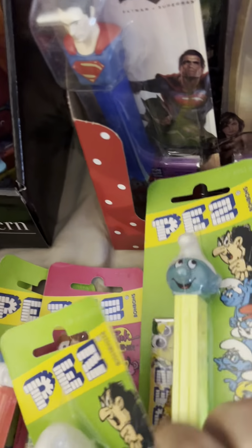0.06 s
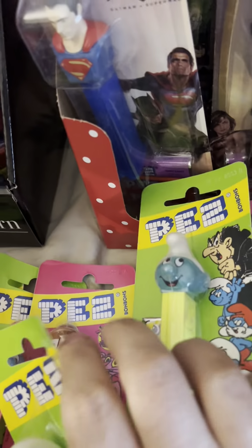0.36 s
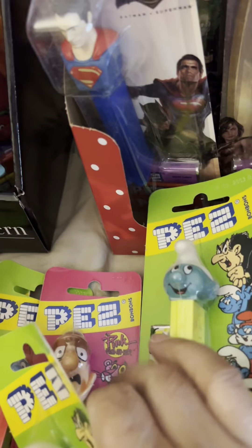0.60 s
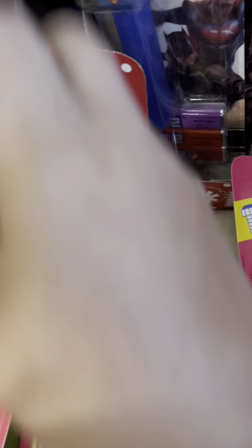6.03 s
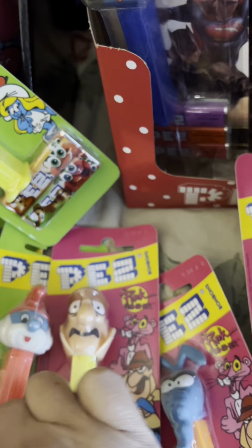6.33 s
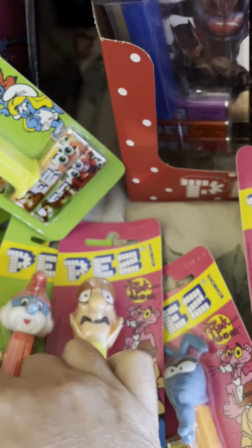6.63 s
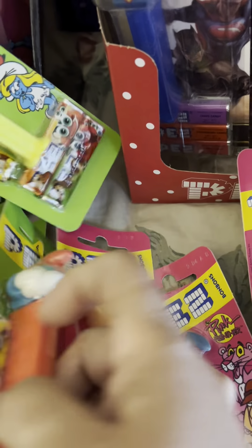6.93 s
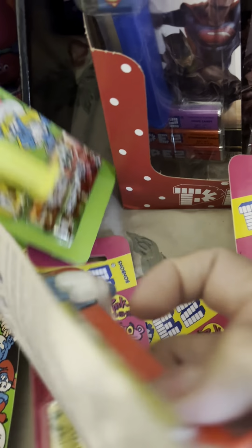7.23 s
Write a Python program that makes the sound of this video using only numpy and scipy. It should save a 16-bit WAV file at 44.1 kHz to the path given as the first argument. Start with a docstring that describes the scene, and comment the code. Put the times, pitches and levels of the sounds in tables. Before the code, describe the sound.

Close handling of plastic and cardboard toy packs, sliding and crinkling against each other with snaps and light bumps.

```python
"""Shuffling toys in blister packs

Carded toys in plastic blisters are shuffled by hand, close by, in a quiet small room. Sliding friction
of card on plastic makes a hiss and a rasp; the thin blisters buckle with ticks and snaps. Impacts
between the packs excite the damped modes of the card, and handling the pile gives an occasional low
boom. Once, a card edge judders across a blister in stick-slip motion."""
import sys
import numpy as np
from scipy import signal
from scipy.fft import rfft, irfft, next_fast_len
from scipy.io import wavfile
from scipy.ndimage import uniform_filter1d, map_coordinates

SR = 44100
rng = np.random.default_rng(int(sys.argv[2]) if len(sys.argv) > 2 else 0)


def store_wav(level_fs):
    """Save 16-bit WAV to argv[1]."""
    pcm = np.round(np.clip(np.atleast_2d(level_fs), -1, 1) * 32767)
    wavfile.write(sys.argv[1], SR, pcm.T.astype(np.int16))


N = 321467

# impacts between packs: (time [s], relative level [dB], centre frequency [Hz])
IMPACTS = [(0.103, -30, 576), (0.118, -38, 170), (0.837, -37, 210), (0.872, -44.5, 116),
           (2.415, -39.5, 113), (3.029, -27, 265), (3.056, -22, 253), (3.144, -21, 364), (3.164, -29, 170),
           (3.2516, -18.5, 468), (3.254, -11, 169), (3.473, -30, 207), (3.91, -23.5, 363),
           (4.032, -34, 273), (5.364, -42, 285), (5.545, -30, 442), (5.602, -29, 387), (5.778, -28.5, 237),
           (5.966, -43.5, 173), (6.1, -21, 170), (6.26, -36, 312), (6.693, -30, 395), (6.741, -31.5, 124),
           (6.777, -27, 292), (6.941, -23, 317), (7.253, -23, 226)]
# spectrum of buckling plastic: (frequency [Hz], level [dB])
BUCKLING_SPECTRUM = [(300, -20), (900, 8.5), (2100, 1.5), (3000, -3), (4000, 1), (7500, -1), (11000, -6),
                     (15800, -16)]


def sliding():
    """Sliding friction: plastic hisses and card rasps, both catching unevenly, while the packs flex."""
    # spectra of the plastic, the card and the bending packs: (frequency [Hz], level [dB])
    hiss_spectrum = [(2300, -8.5), (3000, -3), (3900, -1.5), (4700, -4), (6200, -1), (8200, -2),
                     (11000, -10), (15800, -15.5)]
    rasp_spectrum = [(550, -17.5), (700, -8), (900, 2.5), (1250, 0), (1650, 4.5), (2150, 2.5), (2550, 0),
                     (3200, -17)]
    flex_spectrum = [(45, -5.5), (75, 4), (120, 1), (190, -1), (290, -0.5), (360, -1.5), (450, -5.5),
                     (600, -7), (780, -13)]
    hiss_gain, rasp_gain, flex_gain = slide_gains()
    catching = amp(1.6 * wobble(60) + wobble(250))
    hiss = catching * friction(N, rough_db=1.0, grain_hz=1573, patchy_db=3.0)
    hiss = unit(filtered(hiss, lambda hz: shape(hiss_spectrum, hz)))
    rasp = catching * friction(N, rough_db=2.0, grain_hz=580, patchy_db=5.0)
    rasp = unit(filtered(rasp, lambda hz: shape(rasp_spectrum, hz)))
    flex = friction(N, rough_db=4.0, grain_hz=61.8, patchy_db=2.5)
    flex = unit(filtered(flex, lambda hz: shape(flex_spectrum, hz)))
    return hiss_gain * hiss + rasp_gain * rasp + np.hypot(flex_gain, settling()) * flex


def slide_gains():
    """Friction noise grows with speed, and pressure adds rasp and bending: gains of hiss, rasp, flex."""
    # one pack pushed across the others: (time [s], rise [s], hold [s], level [dB], pressure [dB])
    slides = [(0.0, 0.0019, 0.0062, -43, 9), (0.026, 0.034, 0.049, -49, 6.5), (0.107, .03, 0.094, -58, 5.5),
              (0.226, 0.066, 0.049, -55.5, 0.5), (0.378, 0.08, 0.1, -52, -0.5),
              (0.596, 0.04, 0.021, -51, -6.5), (0.649, .03, .12, -59.5, 2), (0.8, 0.04, 0.021, -51.5, -1.5),
              (0.924, 0.058, 0.056, -53.5, -7.5), (1.08, 0.19, 0.11, -55.5, -6.5),
              (1.355, 0.081, 0.088, -61.5, -11), (1.966, 0.11, 0.044, -67, 0.5),
              (2.127, 0.013, 0.11, -48.5, -6.5), (2.336, 0.086, 0.084, -46.5, -2.5),
              (2.532, 0.061, 0.099, -48.5, -5), (2.836, 0.12, 0.015, -64, 5.5),
              (3.007, 0.031, 0.035, -53, 14), (3.147, .005, 0.021, -50, -2),
              (3.199, 0.042, 0.033, -52, 8.5), (3.514, .06, 0.03, -49.5, 4.5),
              (3.605, 0.02, 0.051, -55.5, 3), (3.68, 0.052, 0.089, -58, 3), (3.841, 0.047, 0.026, -51.5, 4),
              (4.021, 0.0078, 0.045, -52.5, -2), (4.1, 0.048, 0.16, -67.5, 4),
              (4.887, 0.072, .003, -57.5, -10.5), (5.241, 0.039, .02, -67.5, 1.5),
              (5.358, .01, .07, -62, 11), (5.429, .04, .025, -55, 4.5), (5.526, 0.038, 0.083, -58.5, 15.5),
              (5.661, 0.13, 0.046, -56.5, 10), (6.027, 0.076, 0.0082, -53, 6.5),
              (6.251, 0.014, 0.062, -59, 6), (6.35, 0.036, 0.092, -62, 4.5),
              (6.474, 0.053, 0.023, -50.5, 1), (6.572, 0.049, 0.12, -53.5, 0), (6.721, 0.069, .12, -51, 7),
              (6.907, 0.041, 0.073, -46, 6.5), (7.029, 0.044, 0.13, -49, 5.5), (7.218, 0.064, .02, -39, 5)]
    swell_db, stop_t60 = 18, 0.11  # the hand gathers speed, then stops
    creep_db, creep_t60 = -7.5, 0.54  # the packs creep on a little
    power, t = np.zeros((3, N)), np.arange(SR) / SR
    for start, rise, hold, db, pressure_db in slides:
        to_go = np.maximum(1 - t / rise, 0)
        swell = amp(-swell_db * to_go ** 2) * (1 - to_go ** 10)
        after = np.maximum(t - rise - hold, 0)
        speed = swell * np.maximum(fade(after, stop_t60), amp(creep_db) * fade(after, creep_t60))
        rasp_db = -1.5 + 0.22 * pressure_db
        layers = amp([[0], [rasp_db], [pressure_db]])
        add(power, start, (amp(db) * layers * speed) ** 2)
    return np.sqrt(power)


def friction(size, rough_db, grain_hz, patchy_db):
    """Dense micro-slips excite resonances whose narrow peaks and broad colour shift with the contact."""
    def patches(bins, frames):
        across_frequency = uniform_filter1d(rng.standard_normal(spectra.shape[1:]), bins, axis=0)
        return unit(uniform_filter1d(across_frequency, frames, axis=1))

    spectra = signal.stft(rng.standard_normal((2, size + 4096)), nperseg=1024)[2]
    colour_db = patchy_db * (patches(bins=4, frames=7) + .7 * patches(bins=28, frames=10))
    noise = signal.istft(spectra * amp(colour_db), nperseg=1024)[1][:, :size]
    return stereo(noise * amp(rough_db * wobble(grain_hz, size)))


def scrapes(rise_s, release_t60):
    """Transient friction: short scrapes, and one longer, dark rasp of card during a slide."""
    # bursts of friction: (time [s], duration [s], level [dB], tilt above 800 Hz [dB/octave])
    bursts = [(0.043, 0.033, -43.5, 6), (0.436, 0.044, -48, -5.5), (0.857, 0.0196, -42.5, -5.5),
              (0.935, 0.012, -42.5, 2.5), (2.136, 0.024, -49.5, -2.5), (2.394, .035, -51, -5.5),
              (2.571, 0.123, -47, -18), (3.469, 0.026, -45, -5.5), (3.537, 0.012, -46.5, -1),
              (3.57, 0.027, -43, -2.5), (3.672, 0.012, -44, 9), (3.898, 0.063, -34, -1.5),
              (5.359, 0.0083, -47.5, -8.5), (5.599, 0.025, -44, -1.5), (6.259, 0.02, -45, -2),
              (6.687, 0.016, -41.5, -3), (6.9305, .011, -31.5, -2.5), (7.234, 0.012, -41.5, -7)]
    # spectrum of a scrape: (frequency [Hz], level [dB])
    spectrum = [(120, -35.5), (300, 5), (900, -3.5), (1800, 5), (2800, -0.5), (4000, -5), (7000, -3.5),
                (11000, -10), (15800, -20)]
    out, t = np.zeros((2, N)), np.arange(SR // 6) / SR
    for start, duration, db, tilt_db in bursts:
        tilt = lambda hz: amp(tilt_db * np.log2(np.maximum(hz, 800) / 800))
        grit = friction(len(t), rough_db=1.0, grain_hz=696, patchy_db=2.0)
        grit = unit(filtered(grit, lambda hz: shape(spectrum, hz) * tilt(hz)))
        envelope = (1 - np.exp(-t / rise_s)) * fade(np.maximum(t - duration, 0), release_t60)
        add(out, start, amp(db) * grit * envelope)
    return out


def snaps(crack_t60, shell_t60, gain_db):
    """Snap-through buckling: a blister gives a broadband crack, and its thin shell rings briefly."""
    # buckling blisters: (time [s], relative level [dB], shell pitch [Hz], ring re crack [dB])
    buckles = [(0.103, -27, 1460, -3.5), (0.251, -46, 1690, 12), (0.488, -32.5, 7240, -6),
               (0.617, -33.5, 6240, -12), (0.64, -42.5, 1860, 6), (0.703, -32.5, 2530, -9),
               (0.772, -45, 9200, 7), (0.839, -39, 1700, 1), (0.871, -33.5, 1390, -9.5),
               (1.7393, -52, 7230, -6), (3.029, -28.5, 2080, -8), (3.058, -21, 4200, -13),
               (3.1447, -15, 1728, -12.5), (3.474, -43, 2300, 9), (3.684, -36, 7500, -2),
               (4.03, -20, 5130, -35), (5.3615, -40.5, 1370, -14), (5.3913, -42, 2100, -3),
               (5.411, -39.5, 1800, -5.5), (5.5468, -24, 1443, -33), (5.6027, -26, 6800, -10),
               (5.774, -32.5, 1560, -37), (6.261, -31.5, 2515, 3), (6.3159, -44, 2600, 8),
               (6.378, -40, 2354, -10), (6.4481, -32, 6970, -17), (6.501, -27.5, 1693, -13),
               (6.544, -34, 1540, -9), (6.58, -32, 4700, -7), (6.6905, -35, 2220, 11),
               (6.7794, -19, 1660, -18), (6.939, -14.5, 3020, -5), (6.945, -16, 2057, 1),
               (7.1782, -28.5, 3660, -7), (7.249, -17.5, 1860, -34)]
    out, t = np.zeros((2, N)), np.arange(SR // 8) / SR
    onset = t < crack_t60 / 3
    for start, db, shell_hz, ring_db in buckles:
        broad = lambda hz: shape(BUCKLING_SPECTRUM, hz) * bell(hz, shell_hz, octaves=1.5)
        narrow = lambda hz: shape(BUCKLING_SPECTRUM, hz) * (bell(hz, shell_hz, octaves=.12) + amp(-21))
        noise = stereo(rng.standard_normal((2, len(t))))
        crack = filtered(noise * fade(t, crack_t60), broad)
        ring = filtered(noise * fade(t, shell_t60), narrow)
        snap = crack / crack[:, onset].std() + amp(ring_db) * ring / ring[:, onset].std()
        add(out, start, amp(db + gain_db) * snap)
    return out


def knocks(gain_db, attack_cycles, hold_s, damping_t60, free_db):
    """Modal vibration: impacts ring the card, soft ones its low modes; the hand damps most of the ring."""
    # modes of a carded pack: (frequency [Hz], level [dB], t60 [s])
    pack_modes = [(111, -6, .12), (139, -3, 0.098), (174.6, 1.5, 0.11), (213, -3.5, 0.11), (257, -5, 0.11),
                  (320.5, -2.5, 0.11), (352.7, -2, 0.087), (436, -0.5, 0.074), (516.4, -2, 0.088),
                  (645, 1, 0.045), (772, -4, 0.075)]
    out, t = np.zeros((2, N)), np.arange(SR // 3) / SR
    hz, mode_db, t60 = np.transpose(pack_modes)[:, :, None]
    for start, db, centre_hz in IMPACTS:
        detune, size, phase = rng.standard_normal((3, len(pack_modes), 1))
        contact_s = attack_cycles / centre_hz  # a softer blow stays in contact for longer
        swing = np.sin(2 * np.pi * (hz * (1 + 0.016 * detune) * t + 0.14 * phase))
        modes = amp(mode_db + 2.1 * size) * bell(hz, centre_hz, octaves=0.56) * fade(t, t60) * swing
        attack = 1 - np.exp(-t / contact_s)
        damping = fade(np.maximum(t - hold_s, 0), damping_t60) + amp(free_db)
        add(out, start, unit(modes.sum(0) * attack * damping) * amp(db + gain_db))
    return out


def settling(gain_db=-26.5, t60=0.29):
    """Free decay: the gain of the pile's flexing dies away after each impact."""
    power, t = np.zeros((1, N)), np.arange(SR) / SR
    for start, db, _ in IMPACTS:
        add(power, start, (amp(db + gain_db) * fade(t, t60)) ** 2)
    return np.sqrt(power[0])


def booms(pitch_hz, t60):
    """Damped oscillation: handling the pile now and then gives a short, low boom."""
    # handling booms: (time [s], level [dB])
    onsets = [(0.107, -32.5), (0.979, -40), (2.41, -38), (3.06, -26), (3.255, -39), (5.613, -34),
              (6.1, -38), (6.751, -35)]
    out, t = np.zeros((2, N)), np.arange(SR // 3) / SR
    boom = np.sin(2 * np.pi * pitch_hz * t) * fade(t, t60) * (1 - np.exp(-t / 0.0049))
    for start, db in onsets:
        add(out, start, amp(db) * boom)
    return out


def judder(jitter, grit_share):
    """Stick-slip motion: each slip of a card edge strikes the resonances of a blister."""
    # course of the judder: (time [s], slip rate [Hz], level [dB])
    course = [(3.896, 335, -60.5), (3.904, 397, -27.5), (3.914, 360, -25.5), (3.921, 365, -22),
              (3.932, 370, -31.5), (3.945, 620, -30), (3.959, 640, -32), (3.967, 700, -66)]
    # resonances of the blister: (frequency [Hz], bandwidth [Hz], level [dB])
    resonances = [(353.6, 81, 0.5), (633, 130, -0.5), (1240, 750, -9), (1450, 170, -0.5), (2000, 300, -8),
                  (3470, 840, -18)]

    def shell(hz):
        return sum((-1) ** k * amp(db) * 1j * hz * width / (centre ** 2 - hz ** 2 + 1j * hz * width)
                   for k, (centre, width, db) in enumerate(resonances))

    t = np.arange(N) / SR
    times, rates, levels = np.transpose(course)
    slip_hz = np.interp(t, times, rates) * (1 + jitter * wobble(300))
    slips = np.diff(np.floor(np.cumsum(slip_hz) / SR), prepend=0)
    force = unit(slips) * np.array([[1], [.6]]) + grit_share * rng.standard_normal((2, N))
    envelope = amp(np.interp(t, times, levels)) * (t > times[0]) * (t < times[-1])
    return unit(stereo(filtered(force, shell))) * envelope


def crinkle(per_second, gain_db, scatter_db, t60):
    """Micro-buckling: the plastic ticks at random, as strongly as the packs are being slid."""
    out, t = np.zeros((2, N)), np.arange(SR // 50) / SR
    effort = slide_gains()[0]
    for when, size, pitch in rng.random((int(per_second * N / SR), 3)):
        centre_hz = 1800 * 5 ** pitch
        burst = stereo(rng.standard_normal((2, len(t)))) * fade(t, t60)
        tick = filtered(burst, lambda hz: shape(BUCKLING_SPECTRUM, hz) * bell(hz, centre_hz, octaves=1))
        peak = effort[int(when * N)] * amp(gain_db + scatter_db * size ** 2)
        add(out, when * N / SR, peak * tick / abs(tick).max())
    return out


def room(x):
    """The small room's short reverberation, with a fresh random tail every fifth of a second."""
    # reverberation time: (frequency [Hz], t60 [s])
    decay_times = [(150, 0.34), (1500, 0.081), (10000, 0.13)]
    out, step = np.zeros((2, N)), SR // 5
    for start in range(0, N, step):
        hz, t, spectra = signal.stft(rng.standard_normal((2, SR // 4)), SR, nperseg=256)
        decay = fade(t, along(decay_times, hz)[:, None])
        tail = stereo(signal.istft(spectra * decay, SR, nperseg=256)[1])
        mono = x[:, start:start + step].mean(0)[None]
        reflections = signal.fftconvolve(mono, tail / np.linalg.norm(tail[0]), axes=1)
        add(out, start / SR + .004, reflections)
    return out


def background(low_db, hiss_db):
    """Faint stationary noise: a low rumble, a soft band ending near 2.4 kHz, and thin hiss."""
    # spectrum of the background below the hiss: (frequency [Hz], level [dB])
    spectrum = [(15, -45), (25, -18.5), (39, -8), (59, -2.5), (87, -24.5), (123, -10), (175, -22),
                (242, -18.5), (277, -26.5), (416, -32.5), (575, -28.5), (796, -37.5), (1840, -30.5),
                (2480, -44.5)]
    low = filtered(stereo(rng.standard_normal((2, N))), lambda hz: shape(spectrum, hz))
    hiss = filtered(stereo(rng.standard_normal((2, N))), lambda hz: bell(hz, 4900, octaves=0.94))
    return amp(low_db) * unit(low) + amp(hiss_db) * unit(hiss)


def stereo(pair):
    """Mid-side mixing: two signals become left and right, alike in the bass and widest near 1 kHz."""
    # stereo width: (frequency [Hz], side re mid [dB])
    width = [(60, -16.5), (200, -12.5), (500, -6), (1000, -0.5), (2000, -21), (4000, -5), (8000, -9),
             (12000, -6)]
    side = filtered(pair[1], lambda hz: amp(along(width, hz)))
    return np.array([pair[0] + side, pair[0] - side])


def amp(db):
    """Decibels to amplitude gain."""
    return 10 ** (np.asarray(db) / 20)


def unit(x):
    """Normalisation to rms 1."""
    return x / np.sqrt(np.mean(x ** 2) + 1e-20)


def along(points, hz):
    """Interpolation of (frequency [Hz], value) points on a log axis."""
    frequencies, values = np.transpose(points)
    return np.interp(np.log(hz + 1), np.log(frequencies), values)


def shape(points, hz):
    """Gain of a spectrum that rolls off at 12 dB per octave beyond its ends."""
    edge = np.minimum(hz / points[0][0], points[-1][0] / (hz + 1))
    return amp(along(points, hz)) * np.minimum(1, edge) ** 2


def bell(hz, centre_hz, octaves):
    """Band-pass gain, 3 dB down at the given octaves either side of the centre."""
    return 1 / np.sqrt(1 + (np.log2((hz + 1) / centre_hz) / octaves) ** 4)


def fade(t, t60):
    """Exponential decay, 60 dB in t60 seconds."""
    return np.exp(-np.log(1000) * t / t60)


def wobble(rate, size=N):
    """Smooth random modulation, rate knots a second."""
    knots = rng.standard_normal(int(size * rate / SR) + 4)
    return map_coordinates(knots, [np.arange(size) * rate / SR])


def filtered(x, response):
    """Linear filtering: the spectrum of x times a frequency response."""
    size = x.shape[-1]
    padded = next_fast_len(size + 4096)
    return irfft(rfft(x, padded) * response(np.fft.rfftfreq(padded, 1 / SR)), padded)[..., :size]


def add(out, start, sound):
    """Superposition of a sound from start seconds on."""
    part = out[:, max(0, round(start * SR)):][:, :sound.shape[-1]]
    part += sound[..., :part.shape[1]]


def scene():
    """Superposition of the direct sound of the packs, its reverberation and the background."""
    packs = sliding() + scrapes(rise_s=0.00053, release_t60=0.026)
    packs += snaps(crack_t60=0.01, shell_t60=.045, gain_db=-11.5)
    packs += knocks(gain_db=-20.5, attack_cycles=0.55, hold_s=.013, damping_t60=0.048, free_db=-4)
    packs += booms(pitch_hz=58, t60=0.22)
    packs += judder(jitter=.07, grit_share=0.4)
    packs += crinkle(per_second=22, gain_db=8.5, scatter_db=11.5, t60=0.0056)
    return packs + amp(-16.5) * room(packs) + background(low_db=-61.5, hiss_db=-88)


def record(dry):
    """Band-limited pickup: two close microphone ports hear slightly unequal levels and phases."""
    # balance of the ports: (frequency [Hz], left re right [dB])
    balance = [(60, -0.5), (110, 0.5), (200, -1.5), (380, 0), (700, -2.5), (1290, -1.0), (2380, 0),
               (4400, 0.5), (8120, 0.0), (15000, 0.0)]
    # phase between the ports: (frequency [Hz], lead of the left [rad])
    lead = [(300, 0), (690, -0.4), (1290, .6), (1550, 0), (2800, .1), (4500, .3), (5700, -0.4),
            (12000, -0.6), (16000, -1.2)]
    bottom_hz, top_hz = 38, 16000

    def ports(hz):
        left_over_right = amp(along(balance, hz)) * np.exp(1j * along(lead, hz))
        return left_over_right ** np.array([[.5], [-.5]]) * (hz < top_hz)

    bass_cut = signal.butter(3, bottom_hz, "highpass", fs=SR, output="sos")
    return filtered(signal.sosfilt(bass_cut, dry), ports)


dry = scene()
out = record(dry)
store_wav(out)
```